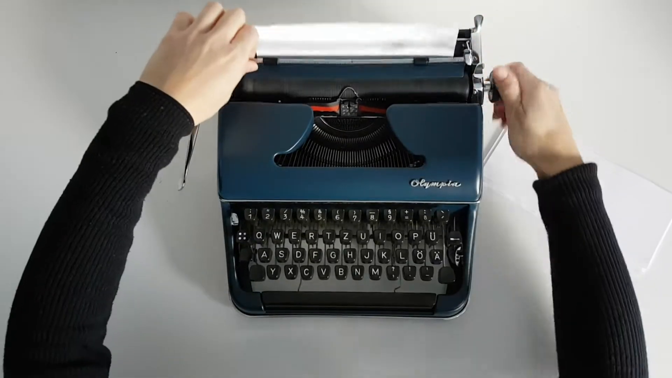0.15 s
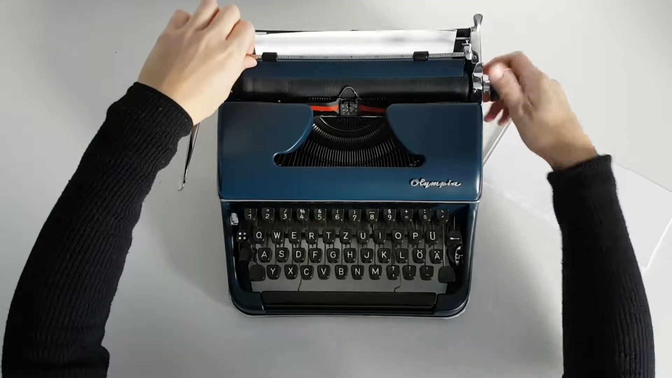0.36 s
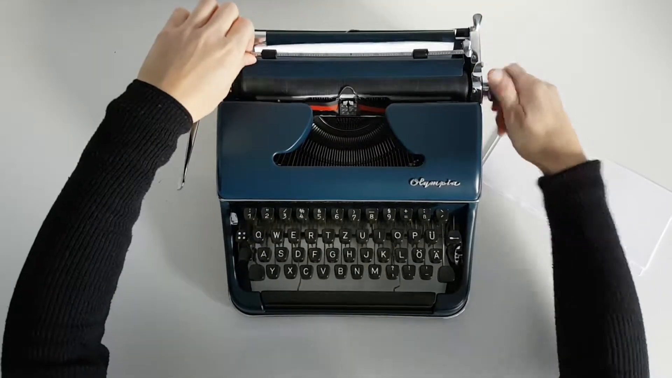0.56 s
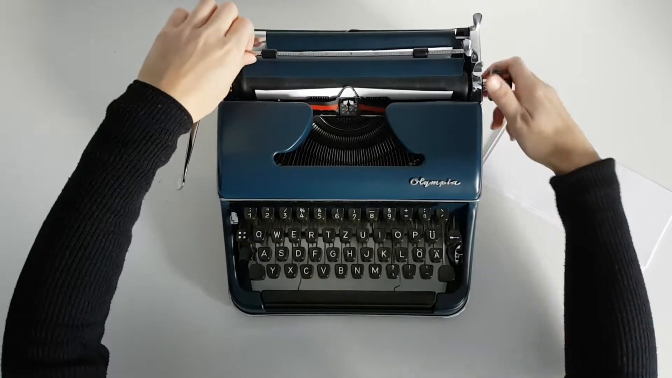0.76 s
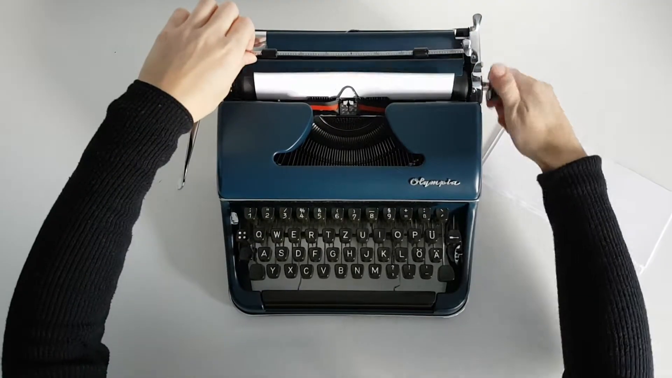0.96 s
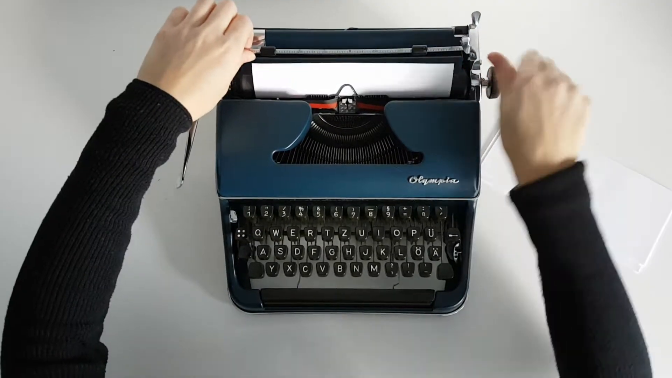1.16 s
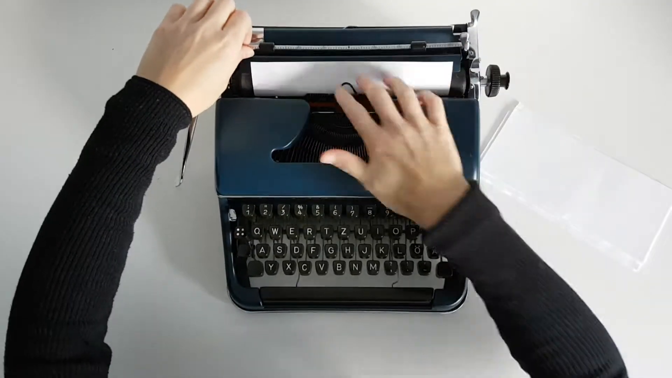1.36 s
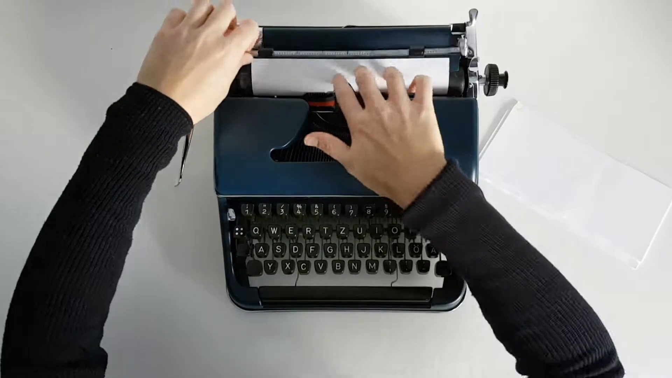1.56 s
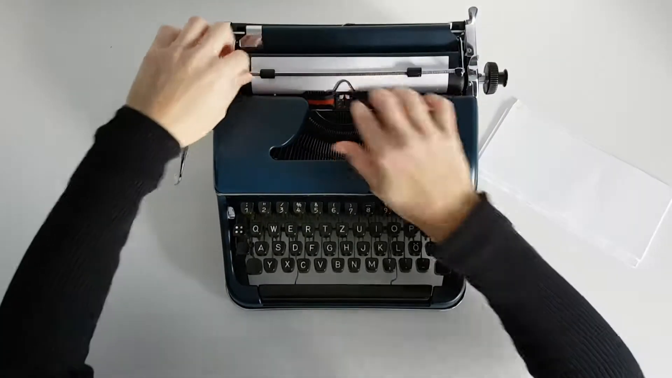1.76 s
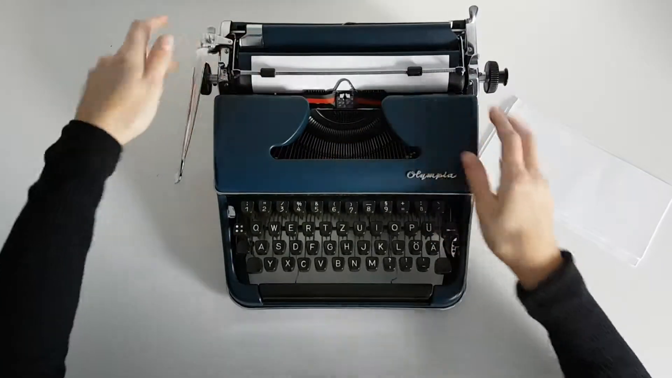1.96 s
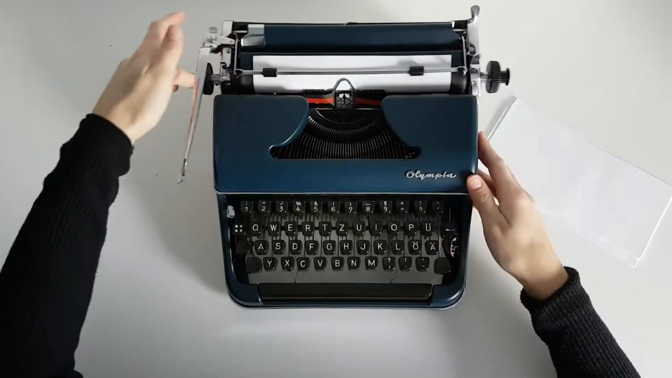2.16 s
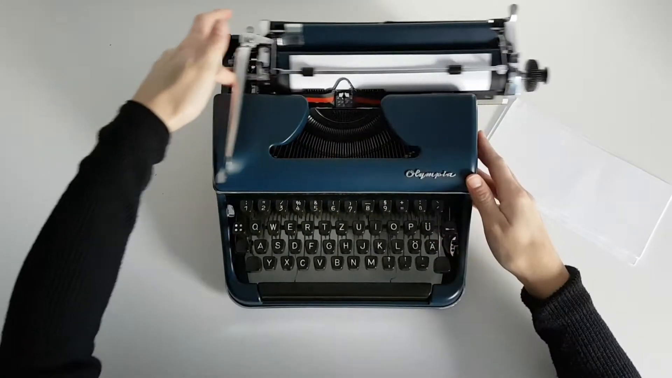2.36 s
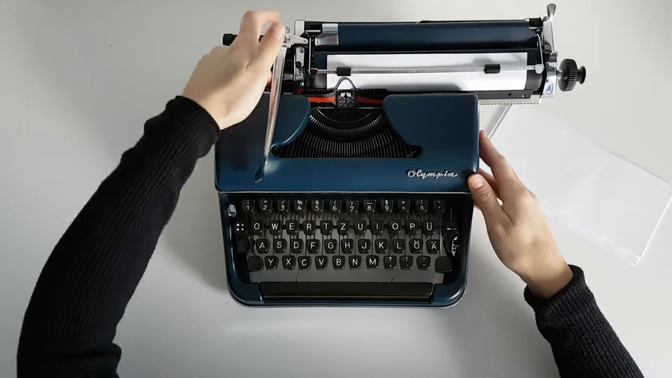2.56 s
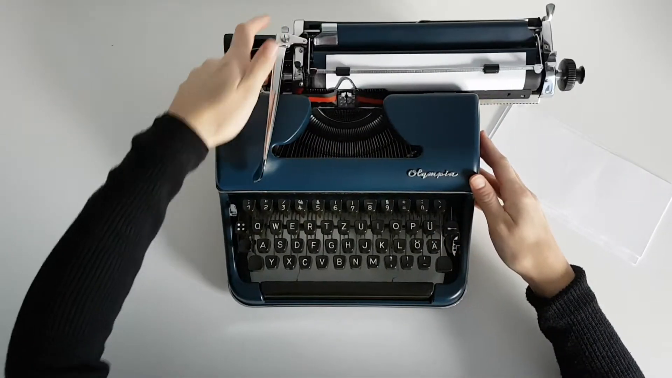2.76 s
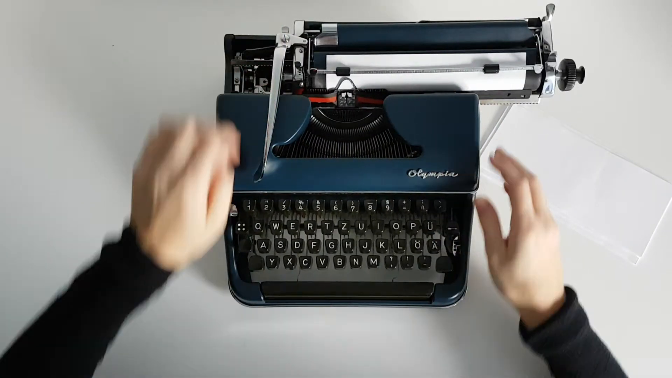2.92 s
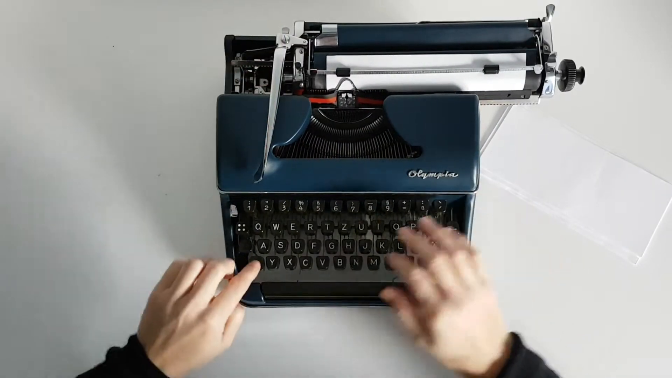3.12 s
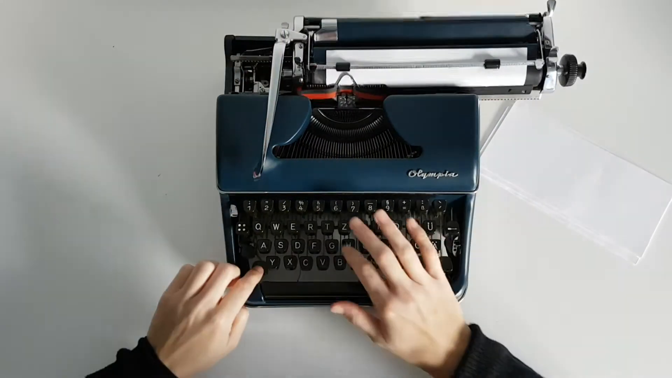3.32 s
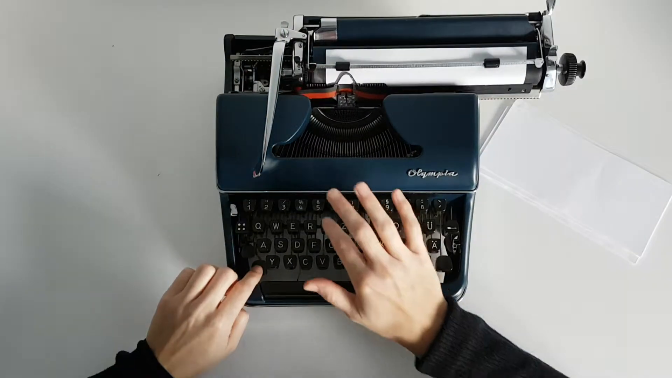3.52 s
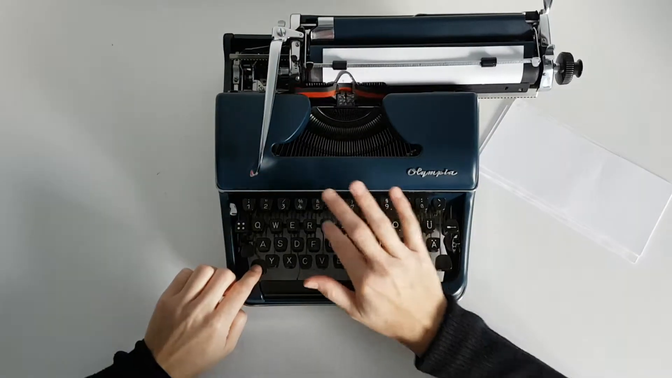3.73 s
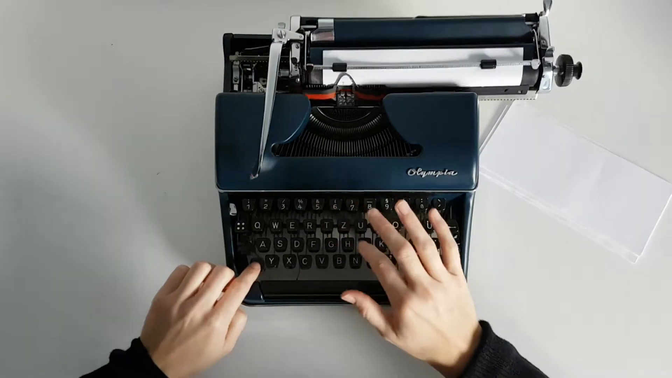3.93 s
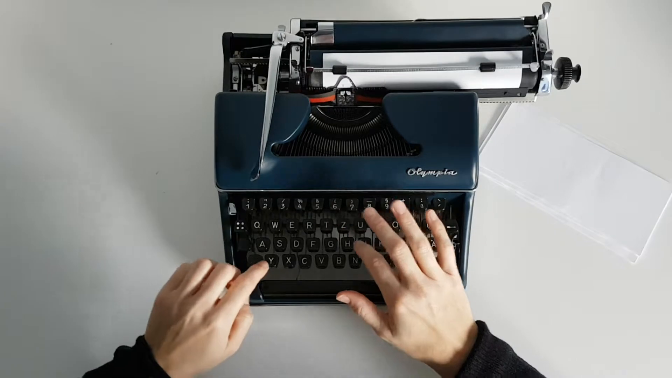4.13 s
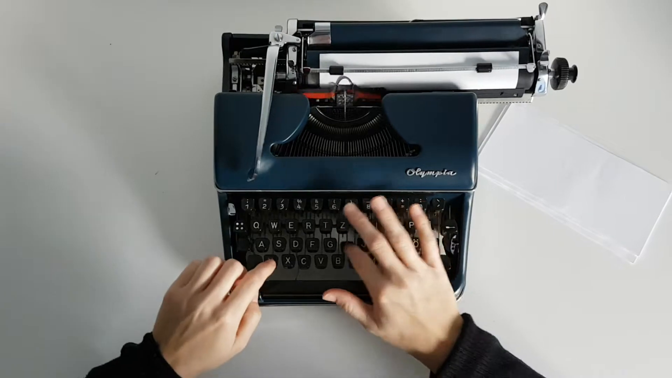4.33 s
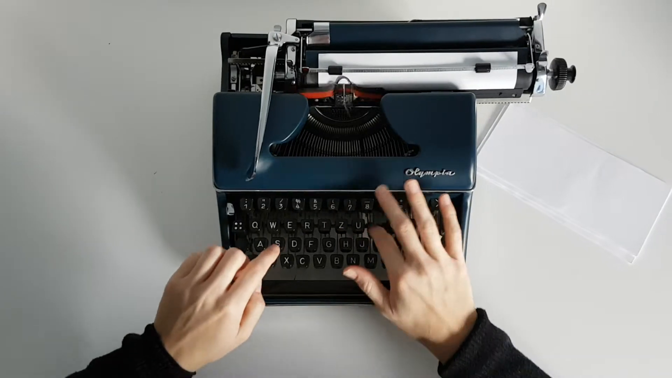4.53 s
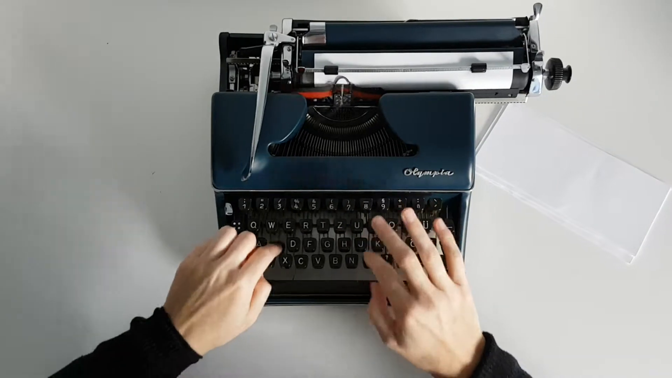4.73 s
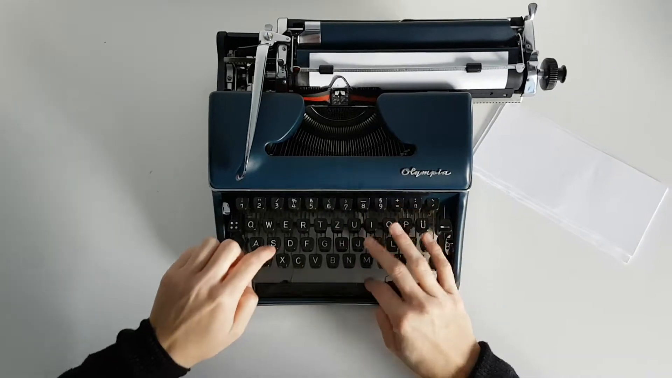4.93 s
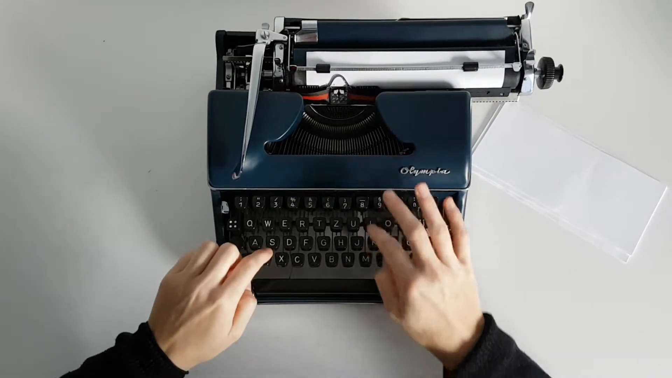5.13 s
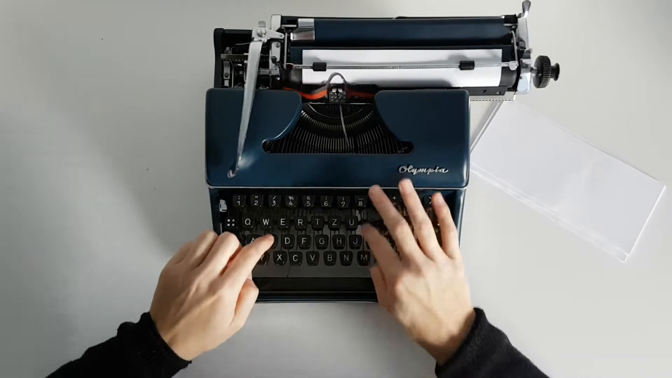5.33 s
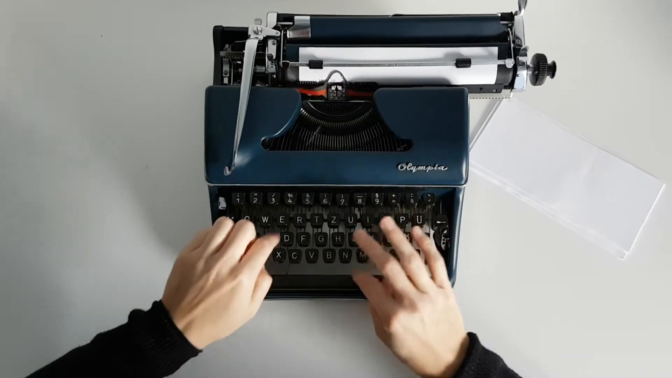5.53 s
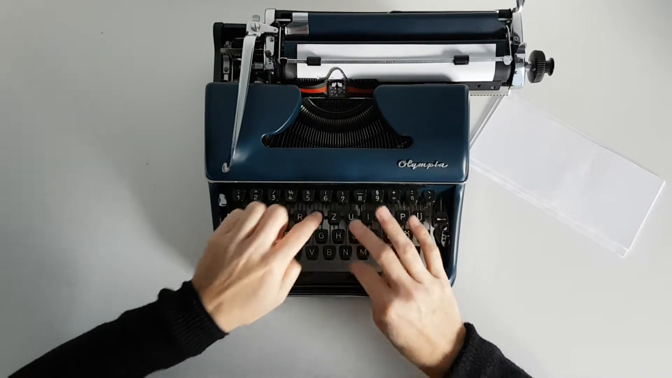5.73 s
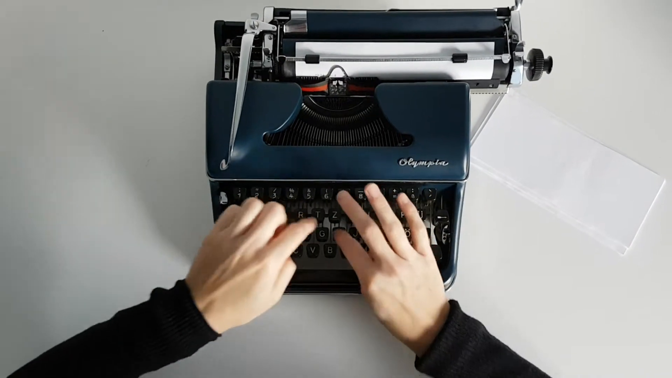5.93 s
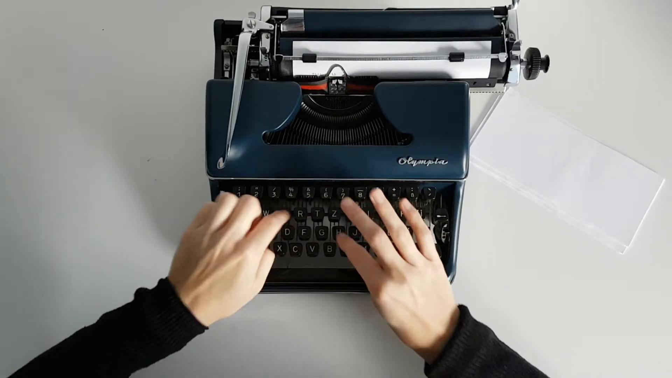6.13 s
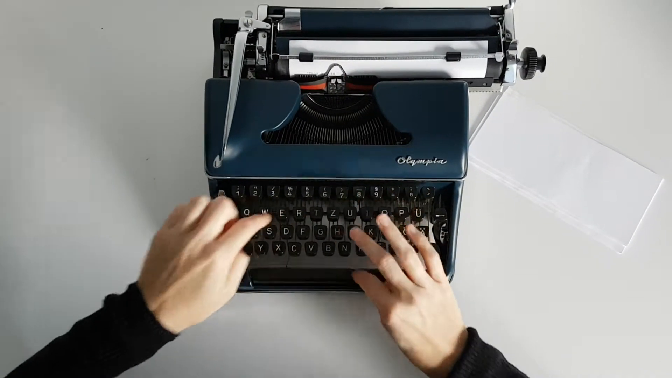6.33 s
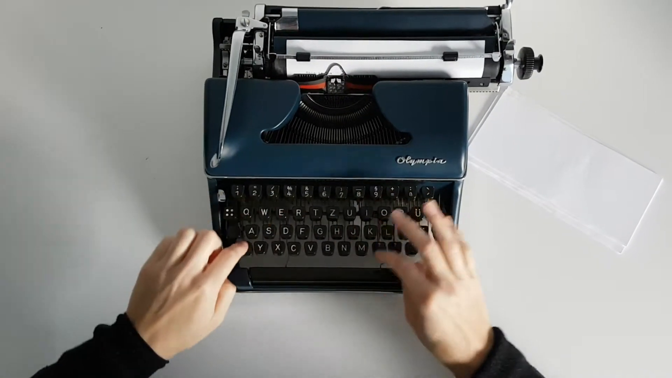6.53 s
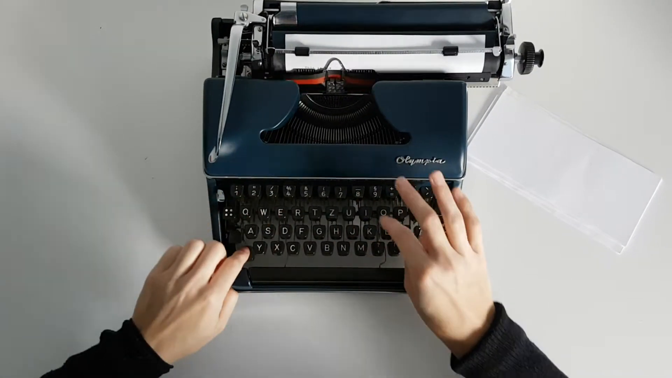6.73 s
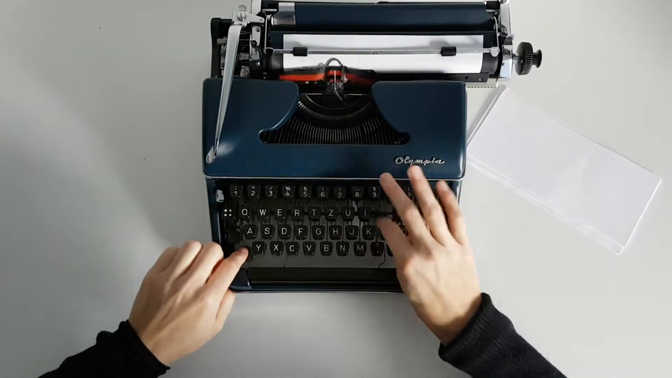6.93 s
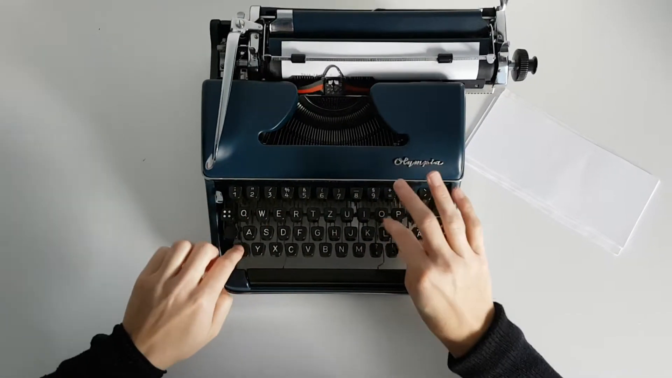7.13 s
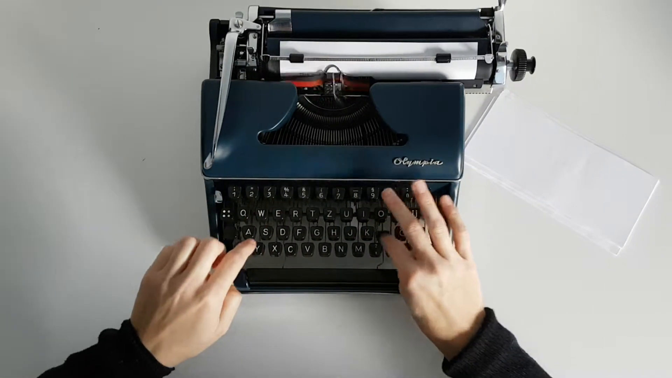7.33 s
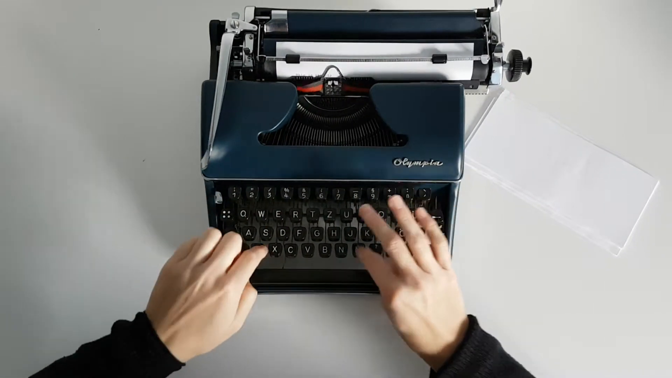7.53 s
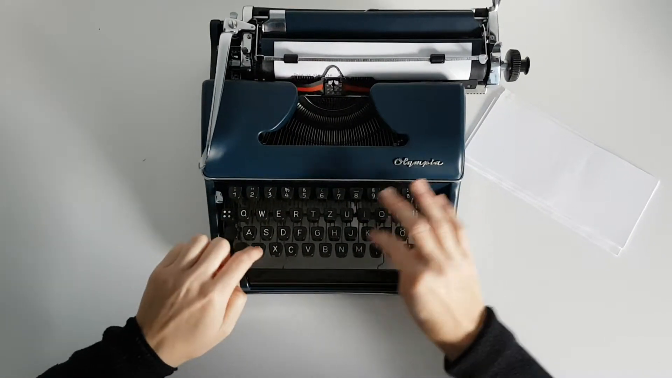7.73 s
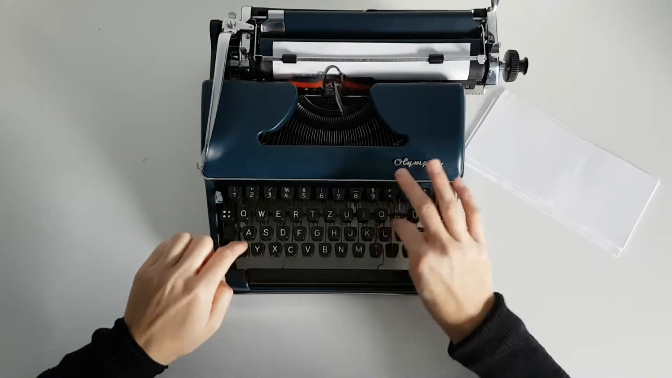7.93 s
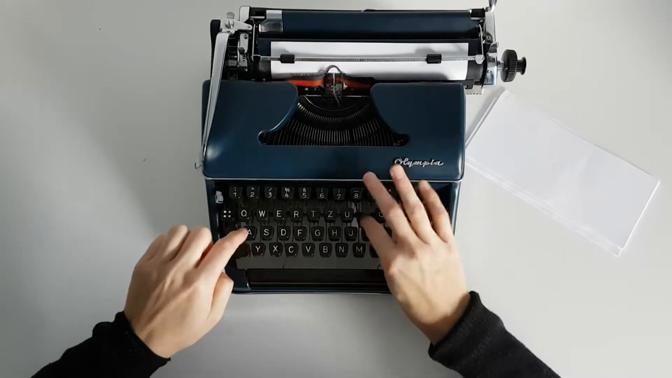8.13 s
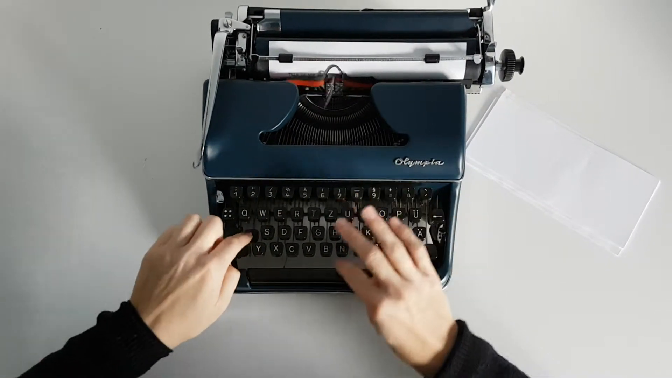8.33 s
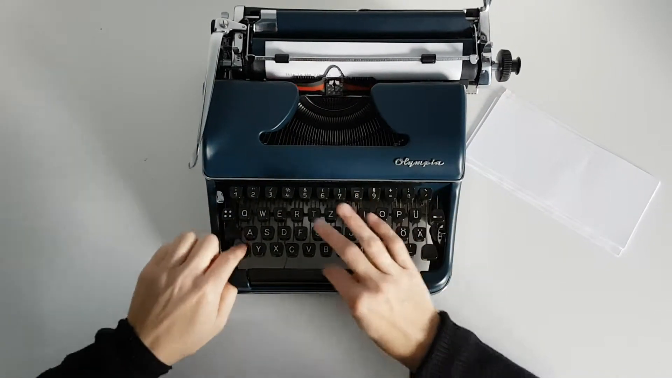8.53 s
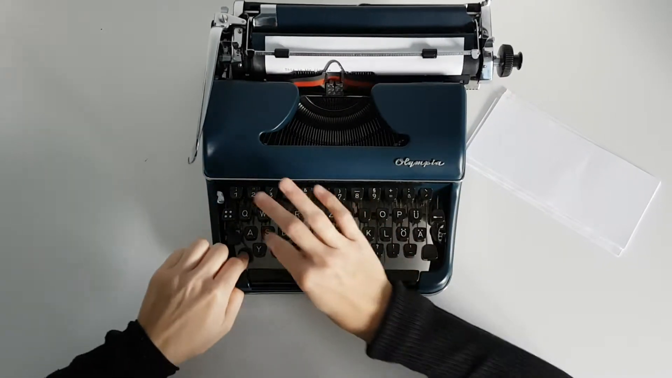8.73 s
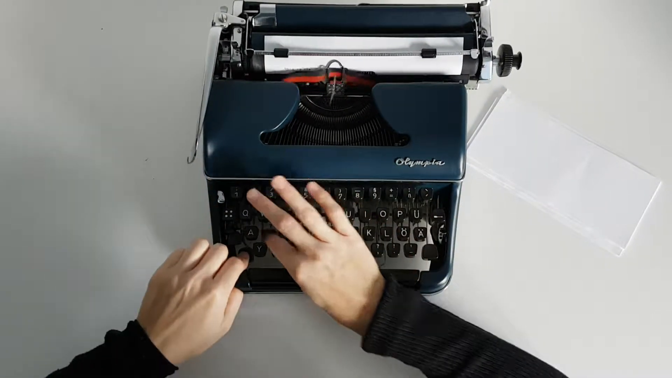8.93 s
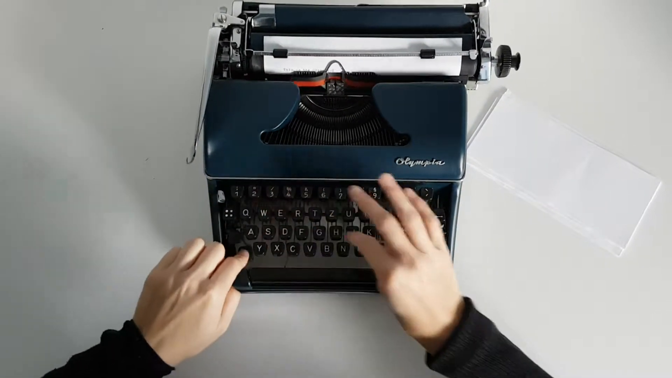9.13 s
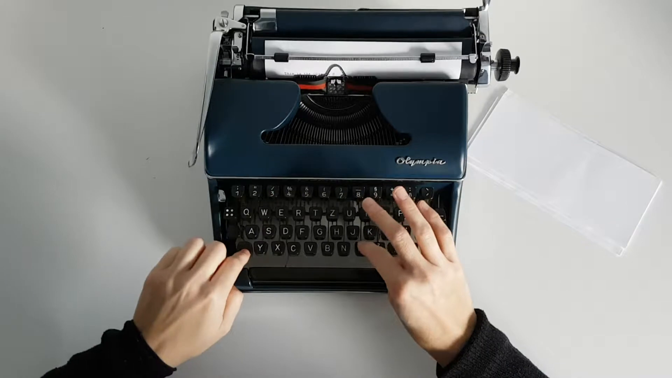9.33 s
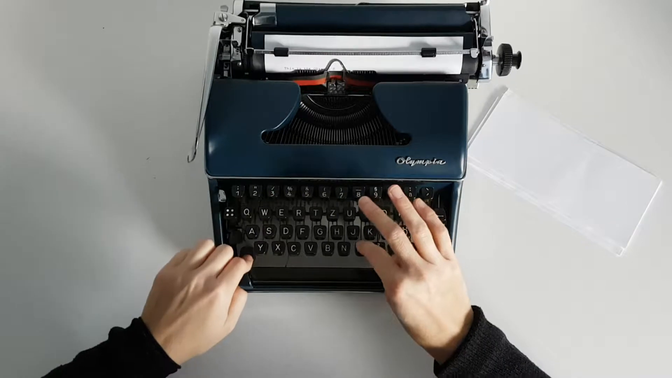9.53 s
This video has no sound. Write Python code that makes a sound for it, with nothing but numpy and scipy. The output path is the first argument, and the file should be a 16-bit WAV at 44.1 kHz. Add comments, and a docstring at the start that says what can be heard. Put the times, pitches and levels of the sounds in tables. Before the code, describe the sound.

Close stereo pickup of a portable manual typewriter on a desk in a small, bare room. Three quick ratchet whirrs wind paper in, a thin rod snaps down, and the carriage slides grittily into a clattering stop. After a pause, hard metallic type slaps come in short runs, with heavy shift clunks, hollow space-bar taps and small spring pings over faint steady background noise.

```python
"""A portable manual typewriter on a desk in a small, bare room, over a faint steady background noise.
A sheet is wound in with three turns of the ratcheting platen, each a run of pawl clicks ringing modes.
The paper bail snaps down as a ringing rod; the carriage slides as gritty noise and crashes into its stop.
Then type bars slap the platen in short runs, as noise bursts with ringing steel and a booming desk,
between hollow taps of the space bar, thumps of the shift mechanism and spring pings."""
import sys
import numpy as np
from scipy import signal
from scipy.fft import rfft, irfft, next_fast_len
from scipy.io import wavfile
from scipy.ndimage import map_coordinates

SR = 44100
rng = np.random.default_rng(int(sys.argv[2]) if len(sys.argv) > 2 else 0)


def unload_audio(sound):
    """Save the sound as a 16-bit wav file, at the path given as the first command line argument."""
    columns = np.transpose(np.atleast_2d(sound))
    # keep every value between -1 and 1, then stretch to whole-number steps
    steps = np.round(np.clip(columns, -1, 1) * 32767)
    wavfile.write(sys.argv[1], SR, steps.astype(np.int16))


N = 422037
LIFE_S = np.arange(SR * 3 // 5) / SR  # time axis of one struck sound

# All levels are relative: the functions add further gains. Spectra give shape only.
# steady background spectrum: f/Hz, level per Hz/dB
BACKGROUND_SPECTRUM = [(15, -46.5), (25, -32.5), (66, 3), (175, -23.5), (242, -14), (344, -27),
                       (714, -26.5), (818, -27.5), (2910, -33), (9070, -47), (16000, -40)]
# room decay: f/Hz, t60/s
ROOM_T60 = [(100, 0.58), (250, .65), (600, 0.44), (1500, 0.34), (4000, 0.32), (8000, 0.3), (15000, 0.093)]
# left-right likeness of noise: f/Hz, correlation/1
LIKENESS = [(60, 0.96), (130, 1), (300, 0.91), (700, 0.84), (1400, 0.35), (2800, 0.14), (10000, 0)]
# microphone pair: f/Hz, left minus right/dB
LEFT_MINUS_RIGHT = [(100, -1.44), (2500, -1.54), (8000, 0.4), (15000, 1)]

# desk and room modes: f/Hz, level/dB, t60/s
DESK_MODES = [(63.6, -2, 0.78), (83.1, 2, 0.47), (142.13, -0.5, 0.77), (204.3, -4, 0.37), (239, -2, 0.41)]
# desk boom spectrum: f/Hz, level per Hz/dB
BOOM_SPECTRUM = [(25, -40.5), (55, 1.5), (85, -2), (110, -21), (150, -1.5), (260, -9), (380, -12.5),
                 (600, -17.5), (2000, -23.5), (8000, -81)]
# cast frame and hood modes: f/Hz, level/dB, t60/s
FRAME_MODES = [(368, -5, .45), (578, -5, .45), (658, -5.5, .32), (787, -2.5, .4), (1060, -1, .3),
               (1105, -3, .3), (1910, -5, .3)]
# clack of metal on metal, spectrum: f/Hz, level per Hz/dB
CLACK_SPECTRUM = [(100, -0.5), (300, -7), (750, 0), (1000, -5), (1300, -5), (1650, -3), (2000, -2.5),
                  (3000, -4), (5000, -11), (8000, -14.5), (15500, -17.5)]
# loose links, spectrum: f/Hz, level per Hz/dB
RATTLE_SPECTRUM = [(100, -6), (300, -10), (480, -17), (780, -3), (920, -10.5), (1080, -3), (1250, -9),
                   (2100, -6), (3400, 0.5), (4400, 0), (5400, -3.5), (8200, -1.5), (9500, -10),
                   (15500, -6.5)]
# decay of rattling parts: f/Hz, t60/s
RATTLE_DECAY = [(200, 0.51), (700, 0.31), (1500, 0.27), (4000, 0.28), (8000, 0.25), (15000, 0.24)]

# carriage and levers knocking: t/s, level/dB
LEVER_KNOCKS = [(.5, -57), (.874, -49.5), (1.425, -60), (1.45, -57.5), (1.672, -52), (2.093, -55),
                (2.122, -61), (2.14, -63), (2.21, -53), (2.741, -44), (2.765, -50), (3.213, -49.5),
                (4.67, -37), (4.988, -37.5), (5.247, -46.5), (6.572, -51), (8.629, -47)]
# carriage push: start t/s, fastest t/s, end t/s
CARRIAGE_PUSH = (2.207, 2.346, 2.546)
# rolling on the rails, spectrum: f/Hz, level per Hz/dB
RAIL_SPECTRUM = [(100, -20), (215, 2), (330, -22), (500, -19.5), (750, -7.5), (1100, -16.5), (1500, -19.5),
                 (2800, -15), (5000, -22.5), (9000, -31.5), (15000, -35)]
# dry rail, spectrum: f/Hz, level per Hz/dB
SCRAPE_SPECTRUM = [(200, -25), (1000, -8), (3000, -2), (5000, 1), (9000, -9), (13000, -6), (16000, -12)]
# dry spot on the rail: t/s, half length/s, level/dB
DRY_SPOT = (2.4, 0.019, -51)
# carriage meets the margin stop: t/s, clatter level/dB, thump level/dB
MARGIN_STOP = (2.53, -23, -33.5)
SLIDE_DB, SLIDE_SWELL_DB = -44, 12  # level at full speed, and its rise from rest

# shift key, down and up in turn: t/s, clack level/dB, thump level/dB
SHIFT_MOVES = [(3.374, -20, -29), (4.006, -24, -26.5), (6.696, -28.5, -33.5), (7.142, -22, -24),
               (8.731, -29, -36.5), (9.263, -28.5, -30)]
# space bar, down and up in turn: t/s, knock level/dB, escapement tick level/dB
SPACE_MOVES = [(4.963, -19, -37.5), (5.043, -18.5, -37), (5.632, -20.5, -36.5), (5.728, -25, -46),
               (6.399, -25, -50.5), (6.48, -26, -44), (8.49, -24.5, -43), (8.579, -28, -52.5)]
# space bar knock, spectrum: f/Hz, level per Hz/dB
SPACE_BAR_SPECTRUM = [(47, -48), (80, 1), (219, -5.5), (347, -13), (526, -18), (655, -25), (797, -7),
                      (1350, -21), (1960, -17), (6110, -29), (7120, -30.5), (9470, -35.5), (15000, -33)]
# space bar modes: f/Hz, level/dB, t60/s
SPACE_BAR_MODES = [(213.6, 4, 0.13), (265, -2.5, 0.11), (337, 2, 0.14), (384, 3, 0.071), (594, -5.5, 0.13),
                   (670, 0, 0.12), (810, -1, 0.11), (1060, -12.5, 0.11)]

# paper bail meeting the platen: t/s, level/dB
BAIL_CONTACTS = [(1.699, -47), (1.7106, -34.5), (1.7169, -26.5)]
# bail rod modes: f/Hz, level/dB, t60/s
BAIL_ROD_MODES = [(1286, -11, 0.15), (1654, -7, 0.1), (2210, -5, 0.057), (2880, 4.5, 0.049),
                  (3040, 4.5, 0.042), (5356, -10, .08)]
# bail contact, spectrum: f/Hz, level per Hz/dB
BAIL_SPECTRUM = [(300, -9.5), (850, -13.5), (1230, -2), (1500, -13), (2150, -2), (2550, -14), (2930, -4),
                 (3600, -3.5), (4400, -13), (5300, -9), (8000, -20), (15000, -29)]

# twists of the platen knob: t/s, length/s, level/dB, easing off by the end/dB
PLATEN_TWISTS = [(0.123, 0.082, -23, 10), (.205, 0.073, -22, 10), (0.565, .095, -21, 11),
                 (0.943, .113, -24.5, 4)]
# last single teeth of the ratchet: t/s, level/dB
SINGLE_TEETH = [(.333, -30.5), (.692, -23), (1.077, -23), (1.111, -30.5), (1.138, -37)]
# pawl drop, spectrum: f/Hz, level per Hz/dB
PAWL_SPECTRUM = [(150, -16), (250, -14), (420, -18.5), (600, -7.5), (730, -14), (880, -2), (1060, -4.5),
                 (1350, -17.5), (1750, -6), (2050, -0.5), (2400, -8), (3000, -6), (5300, -17), (15500, -21)]
# pawl and its spring, modes: f/Hz, level/dB, t60/s
PAWL_MODES = [(885, -6.5, 0.16), (2020, -3.5, 0.095), (3160, -8, 0.056), (3710, -7, .04),
              (8000, -6.5, 0.034), (10940, -6, 0.032)]
TEETH_PER_S, END_TEETH_PER_S = 145, 85  # at the start of a twist and as the hand stops
GRIP_S, GRIP_DB = 0.011, 5.5  # each twist gathers force

# return spring pings: t/s, level/dB
SPRING_PINGS = [(3.786, -37.5), (5.244, -39.5), (5.408, -35), (9.05, -50.5)]
# return spring modes: f/Hz, level/dB, t60/s
SPRING_MODES = [(7200, -8, 0.14), (7800, -0.5, 0.19), (7800, 0, 0.19)]

# type bars: t/s, slap level/dB, rebound level re slap/dB, treble of the slug/dB
TYPE_STRIKES = [(3.6695, -7, -14.5, 4.5), (4.3228, -7.5, -9, 2), (4.572, -8, -19, 1.5),
                (4.766, -7, -13, 1.5), (5.2842, -7.5, -24, -1), (5.469, -8.5, -8, 1.5),
                (5.8364, -10.5, -7.5, 0), (6.0217, -11, -8.5, 1.5), (6.2175, -10.5, -5.5, 0),
                (6.9386, -8.5, -29, 4), (7.3171, -11, -7.5, -2), (7.4961, -9, -8.5, .5),
                (7.6726, -11, -5, 1), (7.9471, -11, -5.5, 2.5), (8.1683, -13, -7.5, -2),
                (8.333, -12.5, -3, 1.5), (8.9501, -12, -4.5, 5.5)]
# slug on platen, spectrum: f/Hz, level per Hz/dB
SLAP_SPECTRUM = [(100, -15), (350, -22), (700, -29), (2100, -17.5), (2600, -3.5), (4400, -1), (5600, -7),
                 (8000, -5), (10000, -12.5), (14000, -4.5), (16000, -19.5)]
# type basket steel, modes: f/Hz, level/dB, t60/s
STEEL_MODES = [(2610, 10, 0.13), (2710, -13.5, 0.38), (2760, -0.5, 0.37), (3200, -9.5, 0.19),
               (3390, 8, 0.15), (3500, 8, 0.23), (3404, 0, 0.2), (4030, -2.5, 0.25), (4500, 0.5, 0.21),
               (4430, 2.5, 0.28), (4530, 2, .27), (4610, 0, 0.17), (4500, -12, .2), (6000, -20, .2),
               (6860, -7.5, 0.25)]
# emphasis of the steel modes, shifting letter by letter
LOW_RING_DB, LOW_GAIN_DB_PER_LETTER, LOW_TOP_DB = -38, 1.4, -22.5
MID_RING_DB, HIGH_RING_DB = -25.5, -16.5
HIGH_HALVED_LETTERS = 8.5  # letters until the high modes halve in amplitude


def amp(db):
    """Decibels to gain."""
    return 10 ** (np.asarray(db) / 20)


def unit(x):
    """Scale to rms 1."""
    return x / np.sqrt(np.mean(x ** 2) + 1e-20)


def along(points, hz):
    """Interpolate (f/Hz, value) points on a log frequency axis."""
    point_hz, values = np.transpose(points)
    return np.interp(np.log(hz + 1), np.log(point_hz), values)


def add(track, start_s, sound):
    """Mix a sound into the track at start_s."""
    part = track[:, max(round(start_s * SR), 0):][:, :sound.shape[-1]]
    part += sound[..., :part.shape[1]]


def swell(x, rise_s):
    """Exponential build-up with time constant rise_s."""
    return x * (1 - np.exp(-LIFE_S / rise_s))


def brighter(spectrum, treble_db):
    """A harder contact lifts the top of a spectrum."""
    return [(hz, db + along([(5000, 0.0025), (11000, treble_db)], hz)) for hz, db in spectrum]


def noise(spectrum, size):
    """Coloured stereo noise, rms 1; the sides grow less alike towards the treble."""
    m = next_fast_len(size)
    hz = np.fft.rfftfreq(m, 1 / SR)
    turn = np.arccos(np.clip(along(LIKENESS, hz), -1, 1)) / 2
    coloured = rfft(rng.standard_normal((2, m))) * amp(along(spectrum, hz))
    mid, side = irfft(coloured * [np.cos(turn), np.sin(turn)], m)
    return unit(np.array([mid + side, mid - side]))[:, :size]


def burst(spectrum, t60_s):
    """One contact: a crowd of modes that die together; t60 fixes its energy before gain."""
    hiss = noise(spectrum, size=8192)
    padded = np.pad(hiss, ((0, 0), (0, len(LIFE_S) - hiss.shape[1])))
    decay = amp(-60 * LIFE_S / t60_s)
    return unit(padded * decay) * np.sqrt(np.mean(decay ** 2))


def fading(spectrum, t60s):
    """A dense ring in which each frequency dies at its own speed."""
    hz, t, bins = signal.stft(noise(spectrum, size=len(LIFE_S)), SR, nperseg=256)
    decay = amp(-60 * t / along(t60s, hz)[:, None])
    return signal.istft(bins * decay, SR, nperseg=256)[1][:, :len(LIFE_S)]


def ring(modes, extra_db, scatter_db, apart_rad, blur_hz):
    """Struck modes at fresh strengths; loose joints blur each line, apart_rad spreads phase between ears."""
    hz, db, t60_s = np.transpose(modes)
    count = len(hz)
    phase = rng.uniform(0, 2 * np.pi, count) + apart_rad * rng.standard_normal((2, count))
    level_db = db + extra_db + scatter_db * rng.standard_normal((2, count))
    gain = amp(level_db) * np.exp(1j * phase)
    drift = 0
    if blur_hz:
        steps = rng.standard_normal((count, len(LIFE_S)))
        drift = np.cumsum(steps, axis=1) * np.sqrt(2 * np.pi * blur_hz / SR)
    decaying = np.outer(2j * np.pi * hz - np.log(1000) / t60_s, LIFE_S)
    return (gain @ np.exp(decaying + 1j * drift)).imag


def background():
    """Faint steady coloured noise."""
    return amp(-57.0) * noise(BACKGROUND_SPECTRUM, size=N)


def room(x):
    """The walls answer: convolution with noise that builds up fast and decays by frequency."""
    colour = [(60, -11.5), (300, 6.5), (1000, 6.5), (5000, 3), (15000, 7)]  # f/Hz, level per Hz/dB
    tail = swell(fading(colour, ROOM_T60), rise_s=0.0013)
    return signal.fftconvolve(x, tail / np.linalg.norm(tail[0]), axes=1)[:, :N]


def thud(rise_s=0.01, boom_db=-2, t60_s=0.53):
    """The frame pushes on the desk, which booms: desk modes plus decaying low noise."""
    boom = amp(boom_db - 60 * LIFE_S / t60_s) * noise(BOOM_SPECTRUM, size=len(LIFE_S))
    modes = ring(DESK_MODES, 0, scatter_db=1, apart_rad=0.1, blur_hz=0)
    return swell(modes + boom, rise_s)


def rocking(rock_hz=73, peak_s=0.019, bump_db=-12):
    """A heavy blow rocks the machine on its rubber feet; it settles with a second, softer bump."""
    u = LIFE_S / peak_s
    rock = np.sin(2 * np.pi * rock_hz * LIFE_S) * u ** 2 * np.exp(1 - u ** 2)
    out = np.array([rock, rock])
    add(out, .055, amp(bump_db) * rock)
    return out


def knock(crack_db, tail_db):
    """Metal meets metal: a short crack, then the frame rattles on."""
    out = amp(tail_db) * fading(CLACK_SPECTRUM, RATTLE_DECAY)
    add(out, 0, amp(crack_db) * burst(CLACK_SPECTRUM, t60_s=0.066))
    return out


def carriage(grain_db=2.5, grains_per_s=260, thud_db=-4):
    """Levers knock; the carriage rolls grittily along its rails and crashes into the margin stop."""
    t = np.arange(N) / SR
    grains = map_coordinates(rng.standard_normal(8192), [t * grains_per_s], mode="wrap")
    grit = amp(grain_db * grains)
    speed = np.interp(t, CARRIAGE_PUSH, [0, 1, 0])
    moving = speed > 0
    roll_gain = moving * amp(SLIDE_DB - SLIDE_SWELL_DB * (1 - speed))
    out = roll_gain * grit * noise(RAIL_SPECTRUM, size=N)

    s, half_s, db = DRY_SPOT
    scrape_gain = amp(db) / (1 + ((t - s) / half_s) ** 2) * moving
    out += scrape_gain * grit * noise(SCRAPE_SPECTRUM, size=N)

    for s, db in LEVER_KNOCKS:
        add(out, s, amp(db) * swell(knock(crack_db=7.5, tail_db=-5), rise_s=.002))
        frame = ring(FRAME_MODES, -1.5, scatter_db=3.5, apart_rad=0.63, blur_hz=3.9)
        add(out, s, amp(db + thud_db) * (thud() + amp(-12.0) * frame))

    s, clatter_db, thump_db = MARGIN_STOP
    clatter = knock(crack_db=4.5, tail_db=-4.5) + amp(-1.0) * burst(RATTLE_SPECTRUM, t60_s=0.14)
    add(out, s, amp(clatter_db) * swell(clatter, rise_s=0.0036))
    add(out, s + 0.015, amp(thump_db) * (amp(9.0) * rocking() + amp(-7.0) * thud()))
    return out


def shift_key(rock_db=6, boom_db=-9):
    """The heavy shift hits its stop and rocks the whole machine."""
    out = np.zeros((2, N))
    for s, clack_db, thump_db in SHIFT_MOVES:
        clack = swell(knock(crack_db=-10.5, tail_db=-10.5), rise_s=0.00023)
        add(out, s, amp(clack_db) * clack)
        thump = amp(rock_db) * rocking() + amp(boom_db) * thud(rise_s=0.0047)
        add(out, s, amp(thump_db) * thump)
    return out


def space_bar(ring_db=-15, knock_gain_db=-10, bounce_db=-5):
    """A dull, hollow knock with the tick of the escapement, and a bounce."""
    out = np.zeros((2, N))
    for s, knock_db, tick_db in SPACE_MOVES:
        for delay_s, drop_db in [(0, 0), (.022, bounce_db)]:
            hollow = amp(ring_db) * ring(SPACE_BAR_MODES, 0, scatter_db=1.5, apart_rad=.5, blur_hz=12)
            contact = amp(knock_gain_db) * burst(SPACE_BAR_SPECTRUM, t60_s=0.2)
            add(out, s + delay_s, amp(knock_db + drop_db) * swell(hollow + contact, rise_s=0.00059))
            tick = burst(RATTLE_SPECTRUM, t60_s=0.053)
            add(out, s + delay_s, amp(tick_db + drop_db - 3) * tick)
    return out


def paper_bail(crack_db=1, tail_db=-12):
    """The sprung rod grazes the paper, then lands and rings."""
    out = np.zeros((2, N))
    for s, db in BAIL_CONTACTS:
        rod = ring(BAIL_ROD_MODES, -2, scatter_db=1, apart_rad=.9, blur_hz=170)
        crack = amp(crack_db) * burst(BAIL_SPECTRUM, t60_s=0.058)
        tail = amp(tail_db) * fading(BAIL_SPECTRUM, RATTLE_DECAY)
        add(out, s, amp(db) * (rod + crack + tail))
    return out


def ratchet(click_db=4, body_db=-5.0, ring_db=-7.0, thud_db=-51, braking=3):
    """The pawl drops into tooth after tooth; each drop rings the hollow carriage and shakes the frame."""
    clicks = list(SINGLE_TEETH)
    for s, length_s, db, easing_db in PLATEN_TWISTS:
        t = np.arange(0, length_s, 1 / SR)
        rate = TEETH_PER_S + (END_TEETH_PER_S - TEETH_PER_S) * (t / length_s) ** braking
        tooth = np.floor(np.cumsum(rate) / SR)
        for at_s in t[np.diff(tooth, prepend=-1) > 0]:
            loss_db = np.interp(at_s, [0, GRIP_S, length_s], [GRIP_DB, 0, easing_db])
            clicks.append((s + at_s, db - loss_db))

    # so light a blow stirs mainly the middle desk modes
    light_db = along([(80, -3), (140, 1.5), (240, 0.5)], np.transpose(DESK_MODES)[0])
    out = np.zeros((2, N))
    for s, db in clicks:
        drop = amp(click_db) * burst(PAWL_SPECTRUM, t60_s=.02)
        drop += amp(body_db) * burst(PAWL_SPECTRUM, t60_s=.1)
        drop += amp(ring_db) * ring(PAWL_MODES, 0, scatter_db=2, apart_rad=1, blur_hz=50)
        click_s = s + rng.normal(0, .0005)
        add(out, click_s, amp(db + rng.normal(0, 1.4)) * swell(drop, rise_s=.0004))
        shake = ring(DESK_MODES, light_db, scatter_db=0, apart_rad=0.078, blur_hz=0)
        add(out, s, amp(thud_db) * swell(shake, rise_s=0.0091))
    return out


def return_spring():
    """A return spring pings: high modes with strongly blurred lines."""
    out = np.zeros((2, N))
    for s, db in SPRING_PINGS:
        add(out, s, amp(db) * ring(SPRING_MODES, 0, scatter_db=1.5, apart_rad=1.3, blur_hz=110))
    return out


def steel_emphasis_db(letter):
    """The place along the platen sets which basket modes ring most."""
    low_db = min(LOW_RING_DB + LOW_GAIN_DB_PER_LETTER * letter, LOW_TOP_DB)
    high_db = HIGH_RING_DB + 20 * np.log10(.5) * (letter / HIGH_HALVED_LETTERS) ** 2
    points = [(2700, low_db), (3400, MID_RING_DB), (4400, high_db), (6000, -23.5)]
    return along(points, np.transpose(STEEL_MODES)[0])


def type_bars(touch_db=-35, trip_db=-23, fall_db=-40, rattle_db=-11.0, steel_db=-3.0,
              thud_db=-31, lever_db=-34, chatter_db=-13, frame_db=-33):
    """Finger on key, escapement tripped, slug on platen, rebound, and the bar falling back to its rest."""
    out = np.zeros((2, N))
    for letter, (s, slap_db, rebound_db, treble_db) in enumerate(TYPE_STRIKES):
        slug = brighter(SLAP_SPECTRUM, treble_db)
        # key and escapement
        add(out, s - .04, amp(slap_db + touch_db) * burst(RATTLE_SPECTRUM, t60_s=0.94))
        add(out, s - .038, amp(slap_db + lever_db) * thud())
        trip = swell(burst(SLAP_SPECTRUM, t60_s=0.26), rise_s=0.00075)
        add(out, s - .009, amp(slap_db + trip_db) * trip)
        # slap, rebound, chatter
        add(out, s, amp(slap_db + 1) * burst(slug, t60_s=.015))
        rebound = swell(burst(slug, t60_s=.013), rise_s=.0004)
        add(out, s + .0048, amp(slap_db + rebound_db + 8) * rebound)
        add(out, s + .009, amp(slap_db + rebound_db + chatter_db) * burst(slug, t60_s=0.19))
        # the blow shakes every loose link, the steel, the frame and the desk
        rattle = swell(fading(brighter(RATTLE_SPECTRUM, treble_db), RATTLE_DECAY), rise_s=0.0031)
        add(out, s, amp(slap_db + rattle_db) * rattle)
        steel = ring(STEEL_MODES, steel_emphasis_db(letter), scatter_db=2, apart_rad=1.13, blur_hz=24)
        add(out, s, amp(slap_db + steel_db) * steel)
        frame = ring(FRAME_MODES, 0, scatter_db=2.5, apart_rad=.8, blur_hz=16)
        add(out, s, amp(slap_db + frame_db) * frame)
        add(out, s, amp(slap_db + thud_db) * thud())
        # bar back at rest
        for delay_s in rng.uniform(.095, 0.12, size=2):
            fall = swell(burst(CLACK_SPECTRUM, t60_s=0.1), rise_s=0.0016)
            add(out, s + delay_s, amp(fall_db) * fall)
    return out


def scene():
    """The machine, its room and a faint steady background."""
    works = carriage() + shift_key() + space_bar() + paper_bail() + ratchet() + return_spring()
    machine = works + type_bars()
    return background() + room(amp(-9.0) * machine) + machine


def record(dry, rumble_hz=32, ceiling=.8, top_hz=15950):
    """Roll off deep rumble, flatten the sharpest peaks, colour the two sides apart, end the treble."""
    rolled_off = signal.sosfilt(signal.butter(2, rumble_hz, "highpass", fs=SR, output="sos"), dry)
    held = rolled_off / (1 + np.abs(rolled_off / ceiling) ** 4) ** (1 / 4)
    m = next_fast_len(N + SR)
    hz = np.fft.rfftfreq(m, 1 / SR)
    colour = amp(np.outer([.5, -.5], along(LEFT_MINUS_RIGHT, hz)))
    band_limit = 1 + (hz / top_hz) ** 120
    return irfft(rfft(held, m) * colour / band_limit, m)[:, :N]


dry = scene()
out = record(dry)
unload_audio(out)
```